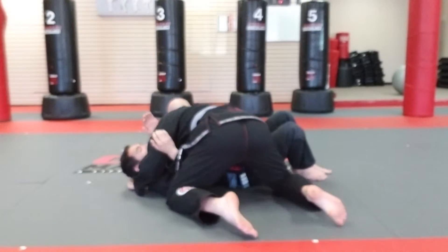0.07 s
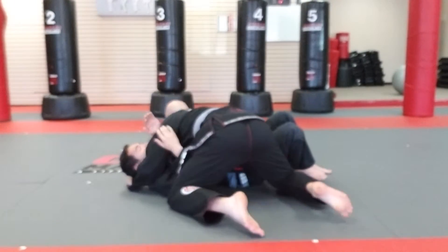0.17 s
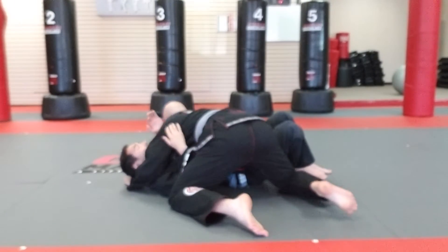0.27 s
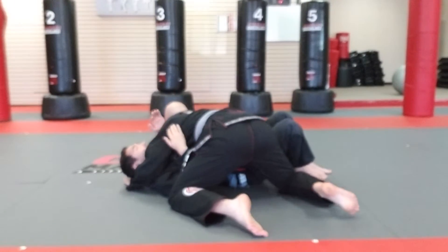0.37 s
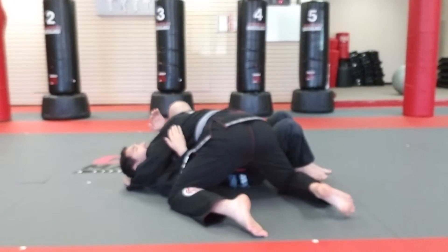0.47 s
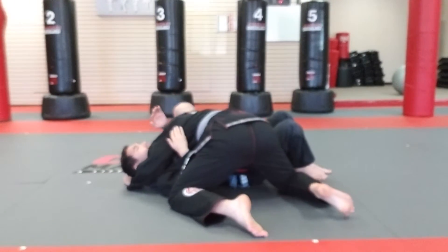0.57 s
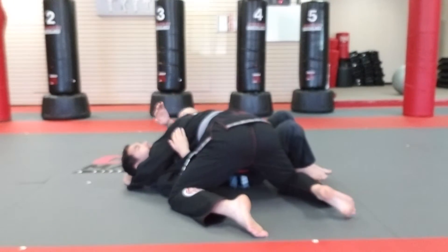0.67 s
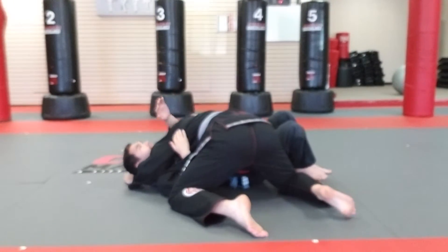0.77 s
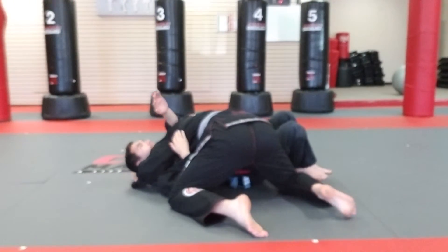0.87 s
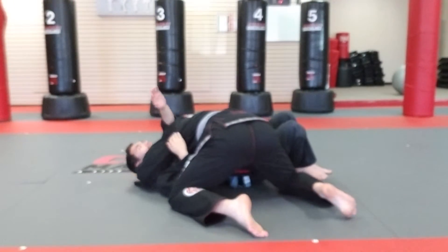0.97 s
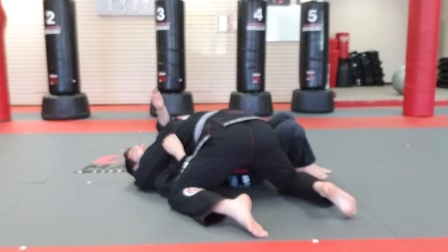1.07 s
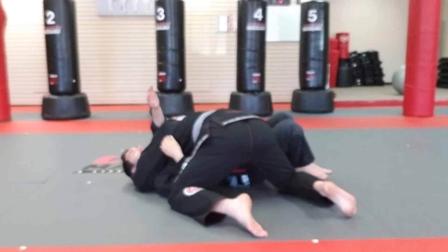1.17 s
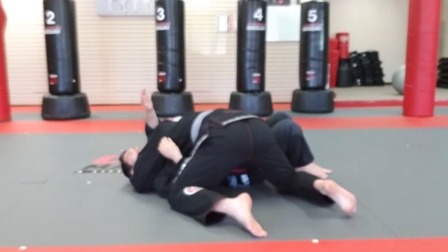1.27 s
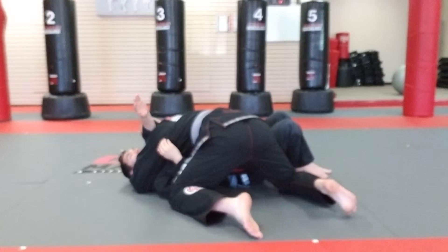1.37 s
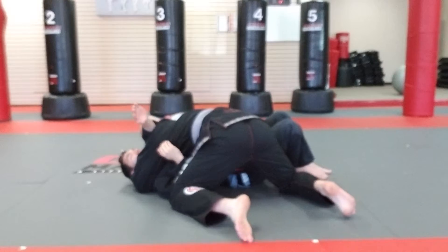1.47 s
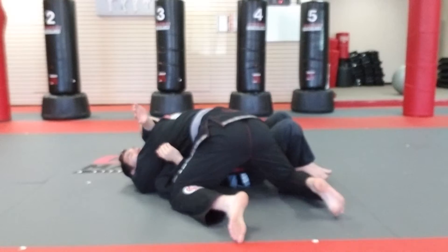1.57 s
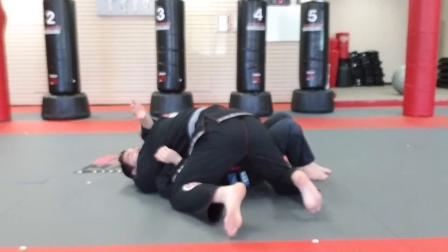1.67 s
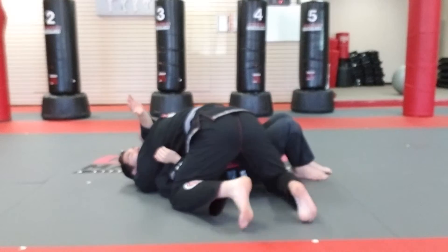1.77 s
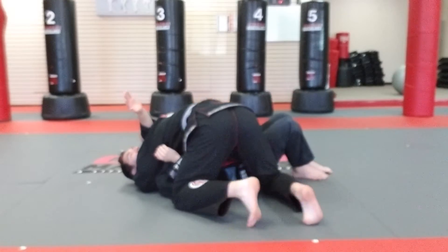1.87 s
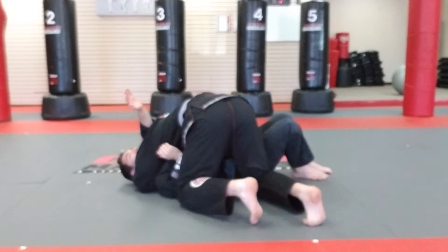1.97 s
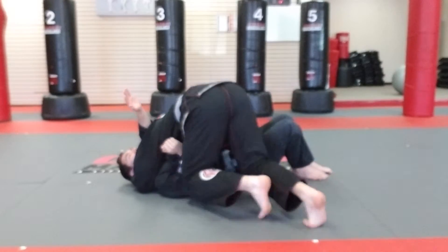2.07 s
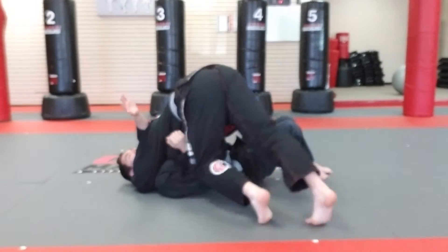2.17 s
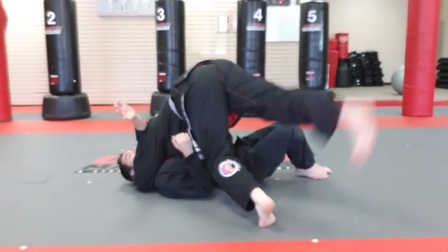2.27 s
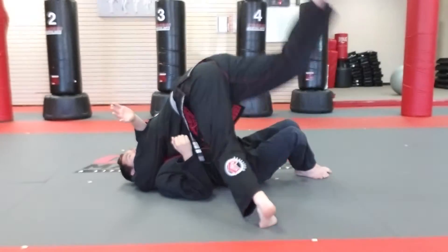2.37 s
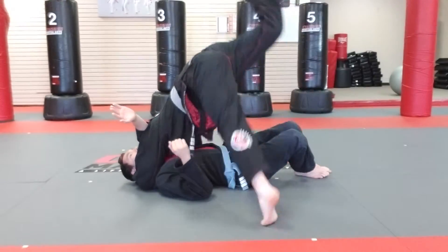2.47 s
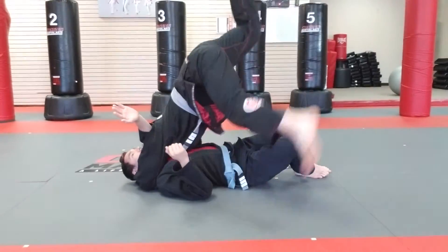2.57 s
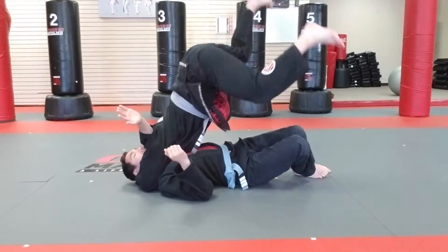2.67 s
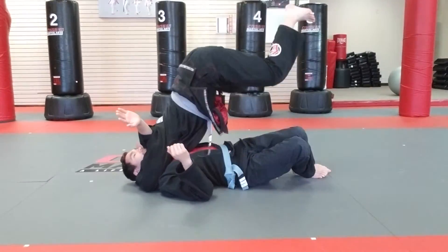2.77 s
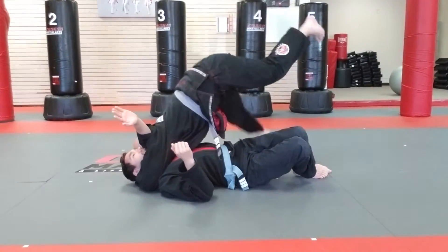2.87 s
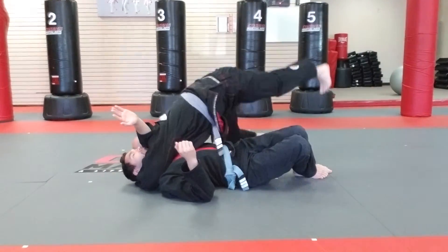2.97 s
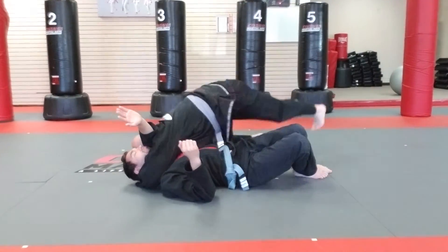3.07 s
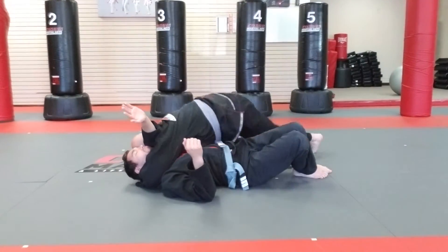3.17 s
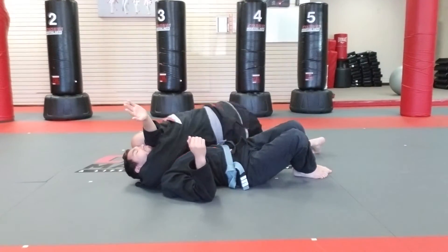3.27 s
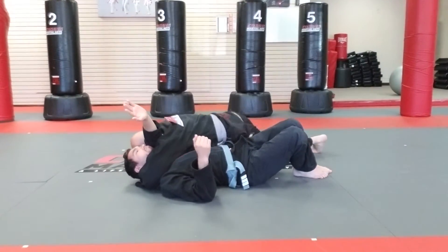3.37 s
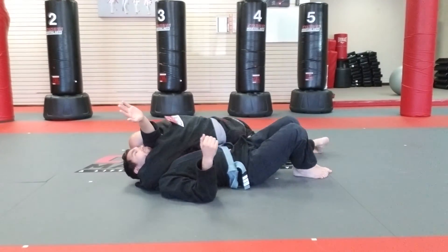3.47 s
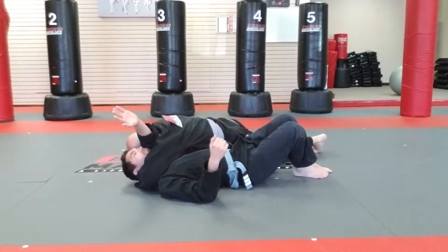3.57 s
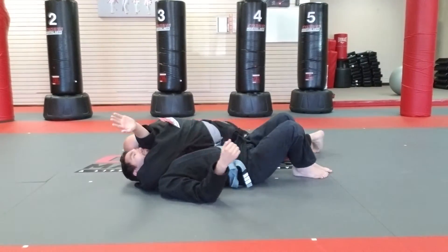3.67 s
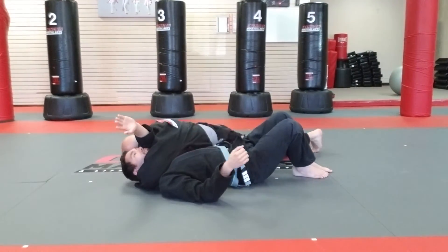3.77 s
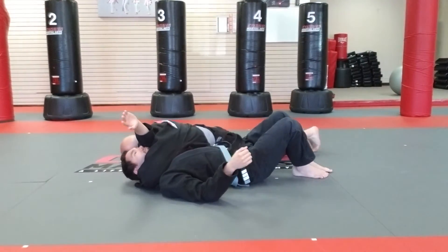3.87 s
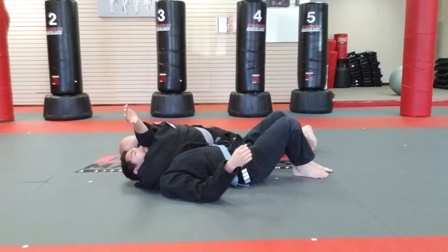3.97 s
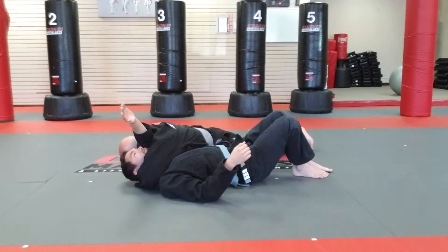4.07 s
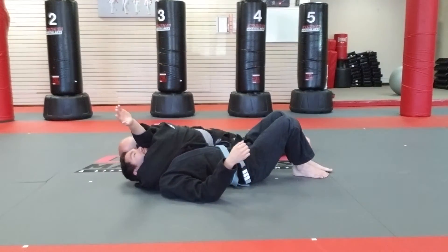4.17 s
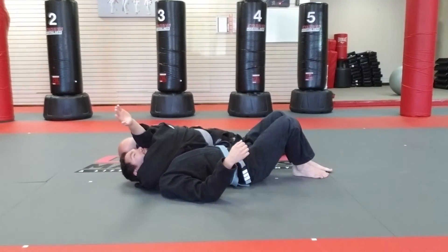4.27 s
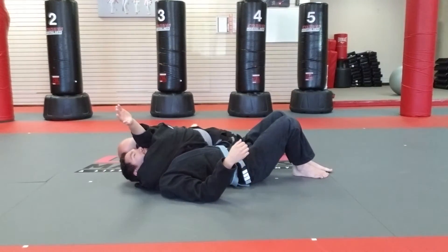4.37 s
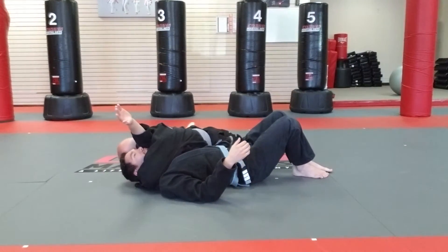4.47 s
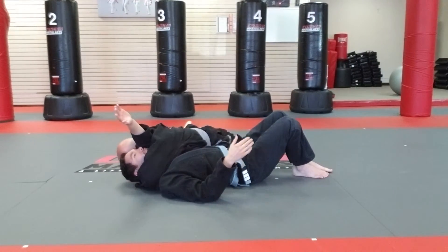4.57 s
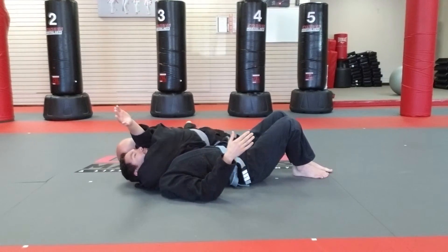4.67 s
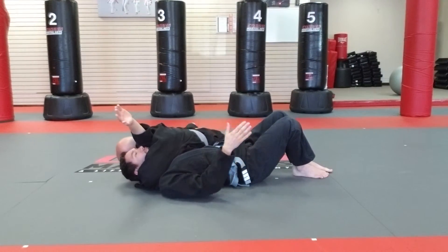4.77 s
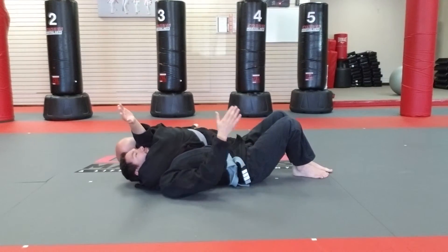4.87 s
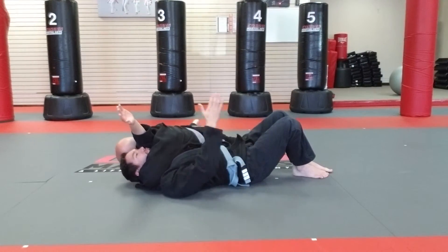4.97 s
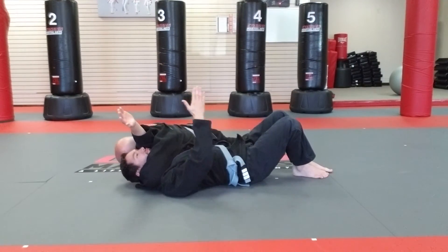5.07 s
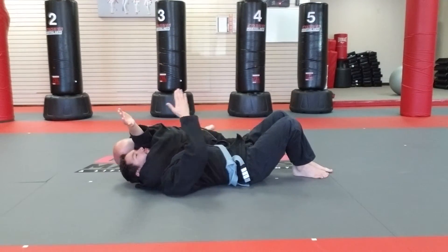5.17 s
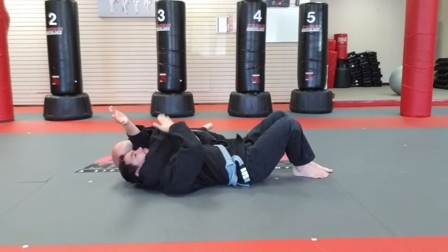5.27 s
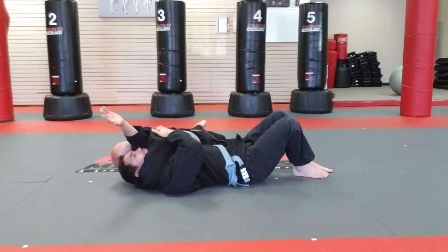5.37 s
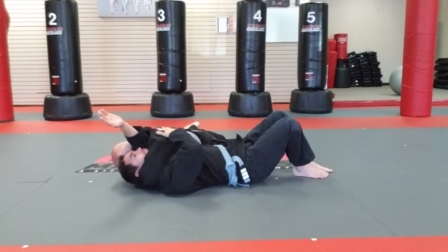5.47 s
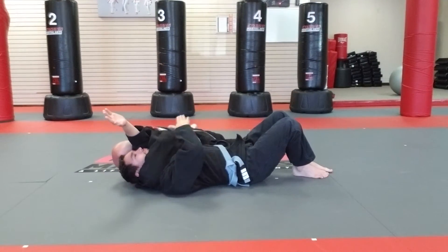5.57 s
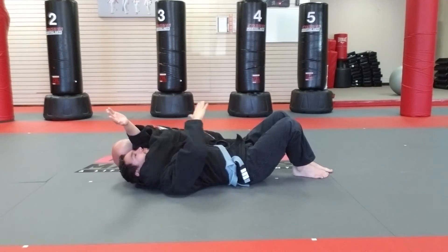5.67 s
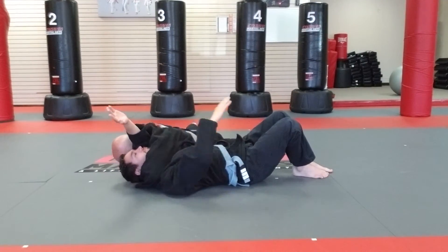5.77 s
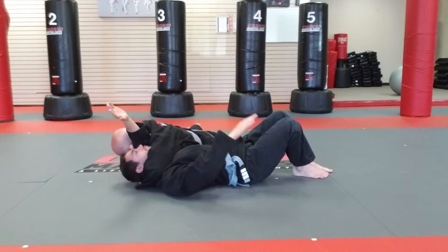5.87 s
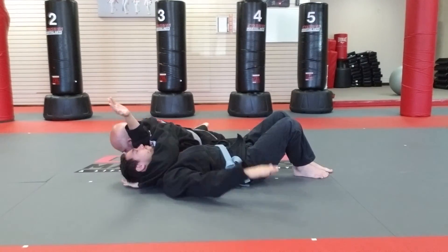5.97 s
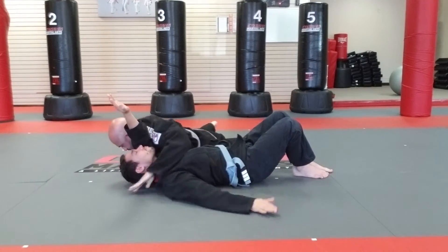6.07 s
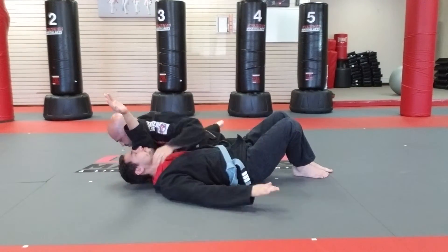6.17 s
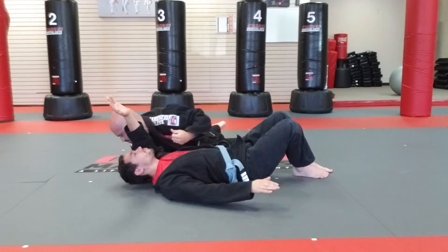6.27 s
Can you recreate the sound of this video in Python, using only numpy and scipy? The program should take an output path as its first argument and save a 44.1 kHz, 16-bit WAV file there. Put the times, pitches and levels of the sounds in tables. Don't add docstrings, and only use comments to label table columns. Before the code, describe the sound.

A steady low hum and beating machine drone fill a hard-walled gym. Fabric drags softly, a knee presses the padding, and movement quickens with light skin taps. A heavy fall thuds into the mat, followed by a knee bump and a small hollow elbow knock. Near stillness follows, then a dull pat on the chest and a loud, crisp slap with low returns, heard from a few metres in stereo.

```python
import sys
import numpy as np
from scipy import signal
from scipy.io import wavfile

SR = 44100
rng = np.random.default_rng(int(sys.argv[2]) if len(sys.argv) > 2 else 0)


def convert_level_to_amplitude(level_db):
    exponent = np.asarray(level_db, float) / 20
    return 10 ** exponent


def persist_wave(psi):
    counts = np.round(np.clip(psi, -1, 1) * 32767).astype(np.int16)
    wavfile.write(sys.argv[1], SR, np.atleast_2d(counts).T)


N = 278491


def in_time(rows):
    s, *columns = np.transpose(rows)
    return [np.interp(np.arange(N) / SR, s, c) for c in columns]


def at_hz(points, hz):
    points_hz, values = np.array(points).T
    return np.interp(np.log(hz), np.log(points_hz), values)


def rms_one(x):
    return x / np.sqrt(np.mean(x ** 2) + 1e-20)


def tilt(db):
    return convert_level_to_amplitude(np.array([[-db], [db]]))


def bandpass(order, low_hz, high_hz, x):
    return signal.sosfilt(signal.butter(order, [low_hz, high_hz], "band", fs=SR, output="sos"), x)


def highpass(hz, x):
    return signal.sosfilt(signal.butter(2, hz, "high", fs=SR, output="sos"), x)


def drift(rate):
    r = np.exp(-80 * np.pi * rate / SR)
    white = rng.standard_normal(N // 40 + 2002)
    slow = signal.lfilter([1], [1, -2 * r, r * r], white)[2000:]
    return np.interp(np.arange(N) / 40, np.arange(len(slow)), rms_one(slow))


EDGES_HZ = 24 * 2 ** np.arange(0, 9.6, .5)


def bands(white, likeness, gain_at):
    out = 0
    for k, (low_hz, high_hz) in enumerate(zip(EDGES_HZ, EDGES_HZ[1:])):
        hz = np.sqrt(low_hz * high_hz)
        gain = gain_at(hz)
        if np.max(gain) > 1e-3:
            mid, side = bandpass(2, low_hz, high_hz, white[k % 2])
            alike = np.clip(at_hz(likeness, hz), -1, 1)
            stereo = np.sqrt(1 + alike) * mid + np.sqrt(1 - alike) * side * [[1], [-1]]
            out = out + gain * stereo
    return out


# pitch_hz, level_db (rms)
MAINS_TONES = [(60, -52), (120, -51), (180, -65.5), (240, -64), (320, -69.5), (531, -69.5)]


def mains():
    t = np.arange(N) / SR
    return np.sqrt(2) * sum(convert_level_to_amplitude(db + 0.6 * drift(5.0)) * np.sin(2 * np.pi * (hz * t + rng.random()))
                            for hz, db in MAINS_TONES)


# time_s, pitch_hz, level_db (rms)
COMPRESSOR_RUN = [(0.0, 89.4, -56), (0.8, 92, -59), (1.03, 90.8, -48), (1.2, 90.5, -54.5),
                  (1.52, 89.6, -45), (1.85, 90.4, -46), (2.1, 90.1, -46.5), (2.4, 90.2, -48),
                  (2.53, 90.3, -61), (2.78, 90.3, -42.5), (3.22, 89.5, -55), (3.4, 88.6, -40.5),
                  (3.65, 88.5, -48.5), (3.8, 89.4, -43.5), (4.2, 89.3, -47), (4.4, 89.5, -43),
                  (5.1, 89.7, -43.5), (6.31, 91.7, -51)]
WOBBLE_DB = -0.9
PARTIAL_RATIO, PARTIAL_DB = 1.52, -16


def compressor():
    hz, db = in_time(COMPRESSOR_RUN)
    phase = 2 * np.pi * np.cumsum(hz) / SR
    tone = np.sin(phase) + convert_level_to_amplitude(PARTIAL_DB) * np.sin(PARTIAL_RATIO * phase)
    return np.sqrt(2) * convert_level_to_amplitude(db + WOBBLE_DB * drift(2.1)) * tone


# freq_hz, level_db (per Hz)
AIR_SPECTRUM = [(22, -25), (35, 6), (60, -9.5), (100, -2.5), (170, -8.5), (250, -10), (400, -17),
                (550, -17.5), (800, -26), (1200, -29), (2500, -37.5), (3400, -45.5), (6500, -42),
                (16000, -54)]
# freq_hz, left_right_likeness (-1..1)
AIR_LIKENESS = [(60, 0.82), (180, 0.96), (550, 0.18), (1650, 0.19), (4970, 0.3), (15000, -0.26)]
AIR_DB = -50


def air():
    white = rng.standard_normal((2, 2, N))
    patchy = bands(white, AIR_LIKENESS, lambda hz: convert_level_to_amplitude(at_hz(AIR_SPECTRUM, hz) + 0.84 * drift(1.9)))
    return convert_level_to_amplitude(AIR_DB) * rms_one(patchy)


def fibres(spectrum, per_s, spread_db, clump_db):
    slips = rng.random((2, 2, N)) < per_s / SR
    sizes = convert_level_to_amplitude(spread_db * np.minimum(rng.exponential(1, N), 4)) * rng.choice([-1, 1], (2, 2, N))
    white = slips * sizes * convert_level_to_amplitude(clump_db * drift(22)) + 1e-18
    below, above = (spectrum[0][0] / 1.5, -90), (spectrum[-1][0] * 1.5, -90)
    closed = [below] + list(spectrum) + [above]
    return rms_one(bands(white, GYM_LIKENESS, lambda hz: convert_level_to_amplitude(at_hz(closed, hz))))


# freq_hz, level_db (per Hz)
DRAG_SPECTRUM = [(290, -37), (500, -8), (807, -16), (914, -3), (1410, -7.5), (1830, -6.5), (2560, -17.5),
                 (6000, -21), (7800, -59), (13200, -120)]
# freq_hz, level_db (per Hz)
SWISH_SPECTRUM = [(1800, -34), (2800, 6.5), (4000, -4.5), (6000, -6.5), (9000, -3), (16000, -19)]
# freq_hz, level_db (per Hz)
SHUFFLE_SPECTRUM = [(150, -7.5), (280, -5.5), (400, -11.5), (550, -6.5), (800, -25.5)]
# peak_s, rise_s, drag_db, swish_db, shuffle_db
MOVEMENTS = [(0.05, 0.17, -55.5, -55.5, -54), (0.21, 0.058, -58.5, -63, -56),
             (0.72, .08, -67.5, -86, -61.5), (0.91, 0.062, -65, -66.5, -58.5),
             (1.481, 0.1, -76, -59.5, -83), (1.72, 0.092, -59.5, -58, -57.5),
             (1.85, 0.083, -51.5, -55, -62), (2.05, 0.064, -58, -61.5, -56.5), (2.17, 0.058, -57, -58, -53),
             (2.30, 0.085, -62.5, -64.5, -55.5), (2.48, 0.066, -59, -54, -59), (2.60, .04, -64, -65, -54.5),
             (2.70, 0.035, -70, -60.5, -57), (2.933, 0.038, -59, -42.5, -37.5),
             (3.03, 0.057, -58, -56, -53), (3.19, 0.041, -52, -58, -48.5), (3.28, 0.1, -56, -57, -47),
             (3.62, .08, -63, -65, -61), (3.78, 0.089, -53, -59.5, -56), (3.90, 0.09, -67, -67, -57),
             (4.65, 0.1, -59.5, -65.5, -74), (4.78, 0.045, -67, -80, -62), (5.93, 0.074, -60, -59.5, -55),
             (6.016, 0.024, -51, -58, -50)]
FALL_PER_RISE = 1.52
SWELL_SHARPNESS = 2.13
# time_s, level_db
SHIFTING = [
    (0.0, -71),
    (1.3, -69.5),
    (3.5, -65),
    (4.05, -74),
    (4.5, -77),
    (5.0, -70),
    (5.6, -75),
    (6.31, -64.5),
]
SHIFT_SWISH_DB, SHIFT_SHUFFLE_DB, SHIFT_UNEVEN_DB = 0, -2, 2


def cloth():
    t = np.arange(N) / SR
    shift_db = in_time(SHIFTING)[0] + SHIFT_UNEVEN_DB * drift(11.0)
    power = convert_level_to_amplitude(shift_db + np.array([[0], [SHIFT_SWISH_DB], [SHIFT_SHUFFLE_DB]])) ** 2
    for peak_s, rise_s, *db in MOVEMENTS:
        near = slice(max(0, round((peak_s - .5) * SR)), round((peak_s + .5) * SR))
        spread_s = np.where(t[near] < peak_s, rise_s, FALL_PER_RISE * rise_s)
        late = (t[near] - peak_s) / spread_s
        power[:, near] += convert_level_to_amplitude(np.array(db))[:, None] ** 2 * np.exp(-2 * np.abs(late) ** SWELL_SHARPNESS)
    drag, swish, shuffle = np.sqrt(power)
    return (drag * fibres(DRAG_SPECTRUM, per_s=2300, spread_db=2.5, clump_db=1.15)
            + swish * fibres(SWISH_SPECTRUM, per_s=12000, spread_db=1.0, clump_db=1.73)
            + shuffle * fibres(SHUFFLE_SPECTRUM, per_s=3000, spread_db=7.0, clump_db=0.5))


def blows(contacts, modes, push_hz, crisp_db, thump_room_db, smack_room_db):
    push, smack, sent = np.zeros((3, N))
    t = np.arange(2600) / SR
    w = 2 * np.pi * push_hz
    for start_s, push_db, smack_db, smack_hz, smack_ms in contacts:
        at = round(start_s * SR)
        here = slice(at, at + len(t))
        push[here] -= convert_level_to_amplitude(push_db) * w * w * t * np.exp(-w * t) / SR
        fade = convert_level_to_amplitude(smack_db) * np.exp(-1000 * t / smack_ms)
        burst = fade * rng.standard_normal(len(t))
        click = (t == 0) * np.sqrt(np.sum(fade ** 2))
        dull = bandpass(2, 450, min(smack_hz, 18000), np.array([burst, click]))
        burst, click = dull - convert_level_to_amplitude(crisp_db) * highpass(3000, dull * 0 + [burst, click])
        smack[here] += burst * np.linalg.norm(click) / np.linalg.norm(burst)
        sent[here] += click
    thump = 0
    for hz, db, t60_s in modes:
        r, turn = convert_level_to_amplitude(-60 / (t60_s * SR)), 2 * np.pi * hz / SR
        ring = signal.lfilter([0, np.sin(turn)], [1, -2 * r * np.cos(turn), r * r], push + 1e-18)
        thump = thump + convert_level_to_amplitude(db) * ring
    thump = highpass(.6 * modes[0][0], thump)
    return np.array([thump + smack, convert_level_to_amplitude(thump_room_db) * thump + convert_level_to_amplitude(smack_room_db) * sent])


# start_s, push_db, smack_db, smack_hz, smack_ms
KNEE_HITS = [
    (1.296, -41.5, -53.5, 1000, 3),
    (1.352, -55, -64, 1009, 3.06),
    (3.160, -31, -55, 3000, 3.44),
    (3.170, -32, -60, 2950, 4.9),
]
# pitch_hz, level_db, t60_s
EDGE_MODES = [(160.7, 5.5, 0.098), (210, 2.5, 0.082), (237.8, -2, 0.3), (286.6, -9, 0.49)]


def knees():
    return blows(KNEE_HITS, EDGE_MODES, push_hz=390, crisp_db=-12, thump_room_db=-8, smack_room_db=-12.0)


# freq_hz, t60_s
GYM_DECAY = [(100, 0.63), (500, 0.54), (2000, 0.26), (6000, 0.49), (16000, 0.33)]
# freq_hz, left_right_likeness (-1..1)
GYM_LIKENESS = [(100, 0.94), (300, 0.87), (700, 0.6), (3000, -0.034), (8000, -0.25), (16000, 0.31)]


def gym(x, first_ms):
    t = np.arange(SR) / SR
    white = rng.standard_normal((2, 2, SR))
    tail = bands(white, GYM_LIKENESS, lambda hz: convert_level_to_amplitude(-60 * t / at_hz(GYM_DECAY, hz)))
    tail = tail * (1 - np.exp(-(1000 * t / first_ms) ** 2))
    tail = tail / np.sqrt(np.sum(tail ** 2) / 2)
    return signal.fftconvolve(tail, x[None], axes=1)[:, :N]


# start_s, push_db, smack_db, smack_hz, smack_ms
SMALL_CONTACTS = [(1.715, -71, -31, 1486, 2.3), (1.780, -71, -32, 1200, 9), (1.865, -69, -57, 2490, 3.8),
                  (2.040, -43, -52, 900, 4.3), (2.095, -44.5, -38, 1716, 4.7),
                  (2.417, -42, -28.5, 1508, 2.1), (2.422, -36.5, -25, 1380, 0.8),
                  (2.447, -42.5, -45, 900, 4), (2.572, -59, -31.5, 1300, 5), (2.605, -50, -40, 1285, 2.2),
                  (3.745, -61, -43, 1286, 4.4), (4.382, -53, -40, 900, 4)]
# pitch_hz, level_db, t60_s
MIDDLE_MODES = [(114, 5, 0.15), (259, 1, 0.053), (433, 2, 0.094)]


def scuffs():
    return blows(SMALL_CONTACTS, MIDDLE_MODES, push_hz=530, crisp_db=-27.5, thump_room_db=-14, smack_room_db=1.5)


def strokes(rows):
    t = np.arange(N) / SR
    return sum(convert_level_to_amplitude(db) * np.exp(-((t - s) / half_s) ** 2) for s, db, half_s in rows)


# peak_s, level_db, half_s
BRUSH_STROKES = [
    (1.872, -52.5, 0.078),
    (2.17, -60.5, .04),
    (2.486, -63.5, 0.062),
    (2.912, -49, 0.014),
    (3.31, -58.5, 0.057),
    (4.665, -55.5, 0.04),
]
# freq_hz, level_db (per Hz)
BRUSH_SPECTRUM = [(1200, -24), (1700, -1), (2200, 4), (3200, -5), (4500, -25)]


def brushes():
    return strokes(BRUSH_STROKES) * fibres(BRUSH_SPECTRUM, per_s=1800, spread_db=8.5, clump_db=2.5)


# peak_s, level_db, half_s
HEM_FLICKS = [
    (2.473, -56, .035),
    (2.925, -56, .02),
    (5.96, -56.5, .05),
    (6.022, -58, .005),
    (6.043, -32, .0015),
    (6.048, -30, 0.0032),
]


def flicks():
    return strokes(HEM_FLICKS) * bandpass(2, 11200, 14400, rng.standard_normal((2, N)))


# start_s, push_db, smack_db, smack_hz, smack_ms
LANDING_HITS = [
    (2.886, -20, -12.5, 1600, 1.7),
    (2.887, -49, -34.5, 4060, 6),
    (2.895, -16, -38, 1560, 3.3),
    (2.926, -28.5, -41, 3320, 5.3),
    (2.948, -23, -39, 3520, 7.8),
    (2.961, -28, -44, 3500, 6),
    (2.996, -38, -41.5, 2010, 6.5),
]
# pitch_hz, level_db, t60_s
FAR_MODES = [(157.8, -37, 0.081), (232, -21, 0.071), (269, -6, 0.14), (295.6, 4, 0.13), (331, -14, 0.037),
             (390, -19, 0.24), (482, -2.5, 0.067), (535, -18, 0.04), (804, -0.5, 0.044), (909, -19, 0.19)]


def landing():
    return blows(LANDING_HITS, FAR_MODES, push_hz=483, crisp_db=-32.0, thump_room_db=-11, smack_room_db=3.5)


# start_s, push_db, smack_db, smack_hz, smack_ms
WEIGHT_PUSHES = [
    (2.890, -34, -70, 996, 3),
    (2.911, -16, -70, 1000, 3),
    (2.958, -27, -70, 1000, 3),
    (3.010, -26.5, -68, 1000, 3),
]
# pitch_hz, level_db, t60_s
FLOOR_MODES = [(51.7, -15, 0.24), (80.6, 2.5, 0.16), (109, -30, 0.11)]


def weight():
    return blows(WEIGHT_PUSHES, FLOOR_MODES, push_hz=200, crisp_db=-30, thump_room_db=-14, smack_room_db=5)


# start_s, push_db, smack_db, smack_hz, smack_ms
ELBOW_KNOCKS = [
    (3.262, -40, -63, 1010, 6.2),
    (3.272, -51, -47, 1000, 5),
]
# pitch_hz, level_db, t60_s
HOLLOW_MODES = [(511, 1, 0.17), (806, 2.5, 0.091), (970, 3.5, 0.065)]


def elbow():
    return blows(ELBOW_KNOCKS, HOLLOW_MODES, push_hz=900, crisp_db=-27, thump_room_db=-21, smack_room_db=-2)


# start_s, push_db, smack_db, smack_hz, smack_ms
PAT_HITS = [
    (5.290, -46, -46.5, 4000, 5.9),
    (5.299, -34.5, -27, 1954, 4),
    (5.303, -43, -21, 1880, 1.4),
    (5.308, -34.5, -25.5, 1770, 2.5),
    (5.313, -38, -49, 2500, 1.33),
    (5.329, -36, -29, 1500, 4.5),
]
# pitch_hz, level_db, t60_s
CHEST_MODES = [(299.4, -30, 0.026), (352, 1.5, 0.061), (482, 3.5, 0.044)]


def pat():
    return blows(PAT_HITS, CHEST_MODES, push_hz=700, crisp_db=-38, thump_room_db=-13.0, smack_room_db=1.5)


# start_s, push_db, smack_db, smack_hz, smack_ms
SLAP_HITS = [
    (6.030, -36, -26.5, 3350, 6.9),
    (6.040, -20, -10.5, 2900, 0.9),
    (6.046, -16, -15.5, 2800, 2.4),
    (6.051, -11.5, -20.5, 1254, 4.7),
    (6.240, -68, -33, 3500, 0.59),
]
# pitch_hz, level_db, t60_s
NEAR_MODES = [(81.9, -32, 0.05), (127, 0, 0.067), (207, 0, 0.027), (156, -21, 0.21), (182.8, -16.5, 0.26),
              (242.5, -4.5, 0.11), (335, -19, 0.056), (452, -17, 0.19), (522, -9.5, 0.068)]


def arm_slap():
    return blows(SLAP_HITS, NEAR_MODES, push_hz=327, crisp_db=-27, thump_room_db=-21, smack_room_db=-2.5)


# start_s, push_db, smack_db, smack_hz, smack_ms
SLAP_RETURNS = [
    (6.070, -27, -30.5, 2500, 6.4),
    (6.097, -28, -48, 2000, 2.9),
    (6.118, -29, -58, 2000, 4),
    (6.143, -24, -40, 1967, 3.5),
    (6.200, -34, -60, 2010, 3.6),
]
# pitch_hz, level_db, t60_s
WALL_MODES = [(159, -13, 0.14), (182.7, 4, 0.3), (217, -3.5, 0.31), (266, 0, 0.12)]


def wall_returns():
    return blows(SLAP_RETURNS, WALL_MODES, push_hz=304, crisp_db=-18.5, thump_room_db=-21, smack_room_db=5.0)


def scene():
    direct, sent = (knees() + scuffs() + landing() + weight() + elbow()
                    + pat() + arm_slap() + wall_returns())
    hits = direct * tilt(.3) + gym(sent, first_ms=6.2)
    tones = (mains() + compressor()) * tilt(.2)
    return tones + air() + cloth() * tilt(.4) + hits + brushes() + flicks()


def band_limit(x):
    return signal.sosfilt(signal.butter(12, 16800, fs=SR, output="sos"), x)


# center_hz, width_hz, gain_db
MIC_PEAKS = [(8460, 870, 2.5), (9340, 1100, -4), (10300, 2800, -2.5), (13150, 1360, 7.5), (15500, 2000, 8)]
# low_hz, high_hz, share_leaning_left
MIC_LEAN = [(500, 13000, -0.15), (5640, 10700, 0.4)]
MIC_LOW_HZ, MIC_TOP_HZ = 55, 15850


def record(dry):
    x = highpass(MIC_LOW_HZ, dry)
    for hz, width_hz, db in MIC_PEAKS:
        a, g = np.tan(np.pi * width_hz / SR), np.sqrt(convert_level_to_amplitude(db))
        c = -2 * np.cos(2 * np.pi * hz / SR)
        x = signal.lfilter([1 + a * g, c, 1 - a * g], [1 + a / g, c, 1 - a / g], x)
    for low_hz, high_hz, lean in MIC_LEAN:
        x = x + lean * np.array([[1], [-1]]) * bandpass(1, low_hz, high_hz, x)
    x = signal.sosfilt(signal.cheby2(10, 30, MIC_TOP_HZ + 300, fs=SR, output="sos"), x)
    return band_limit(x)


dry = scene()
out = record(dry)
persist_wave(out)
```